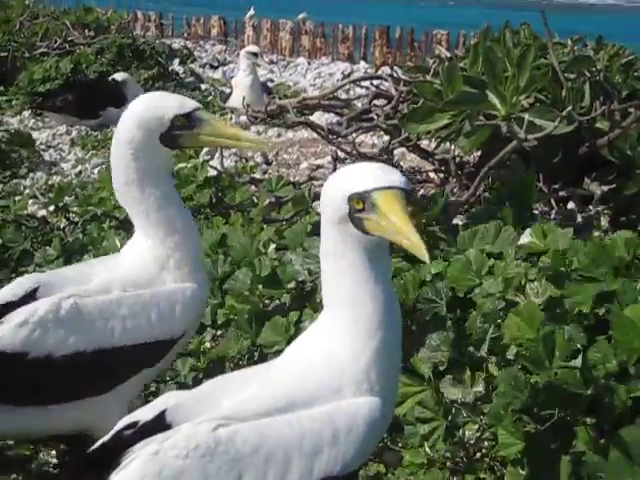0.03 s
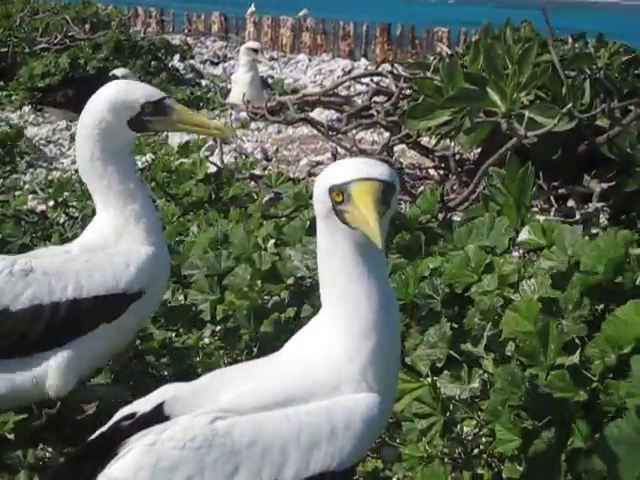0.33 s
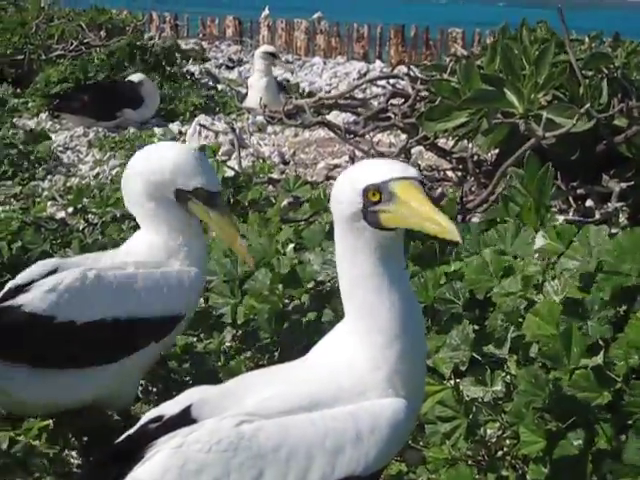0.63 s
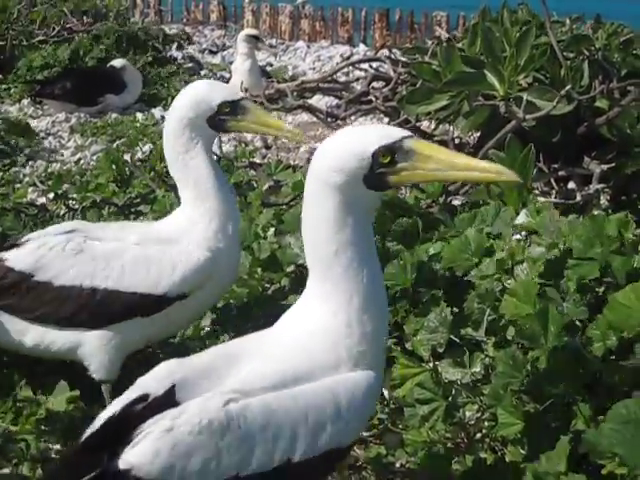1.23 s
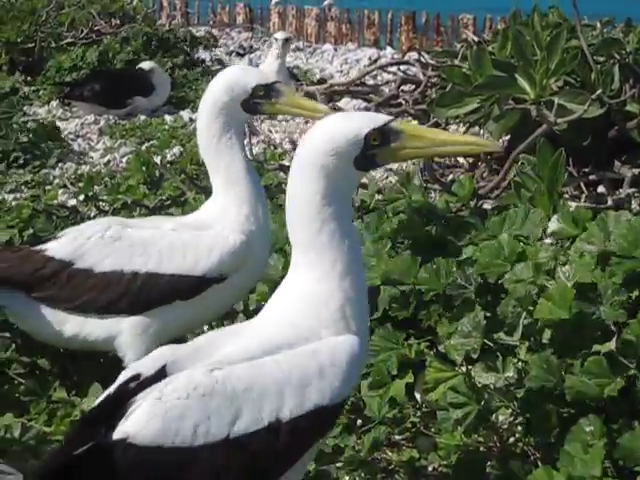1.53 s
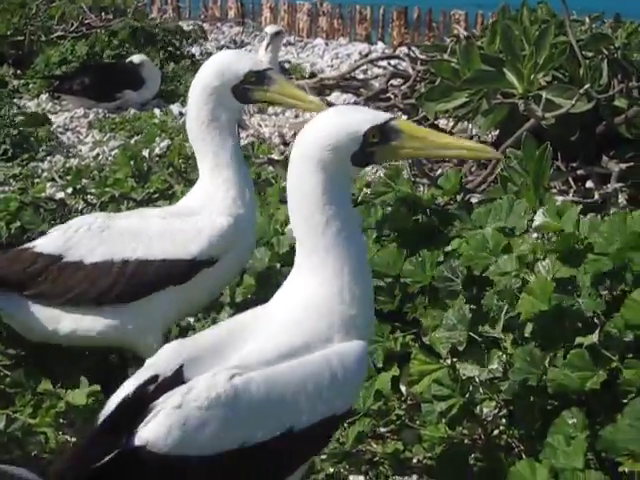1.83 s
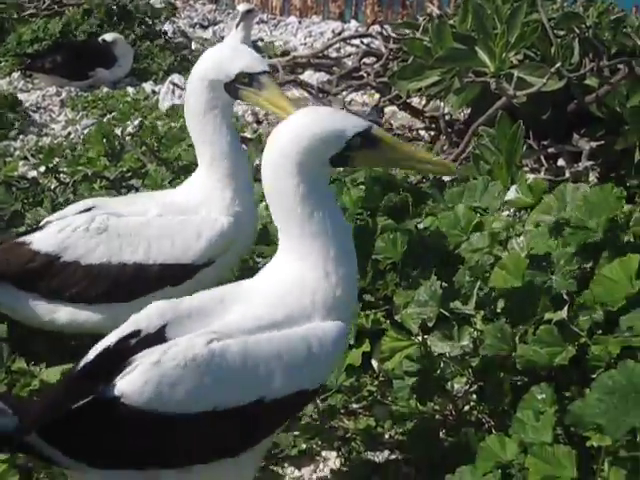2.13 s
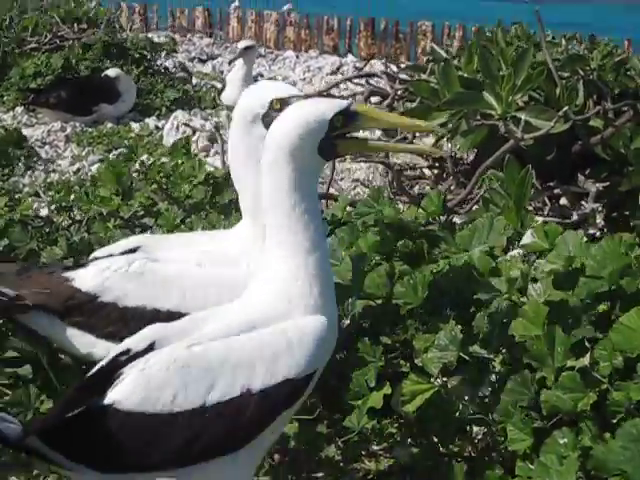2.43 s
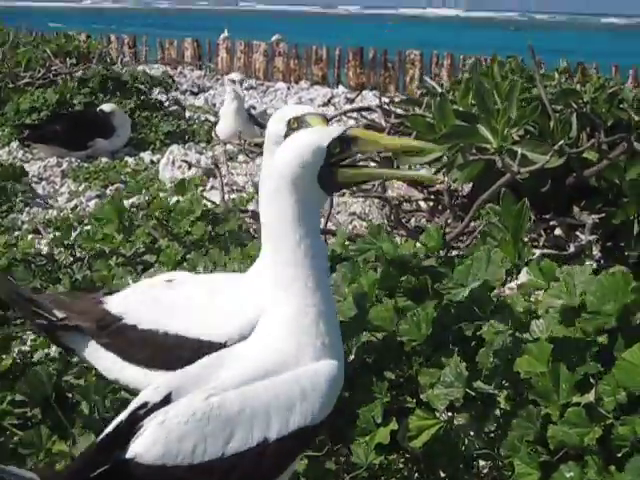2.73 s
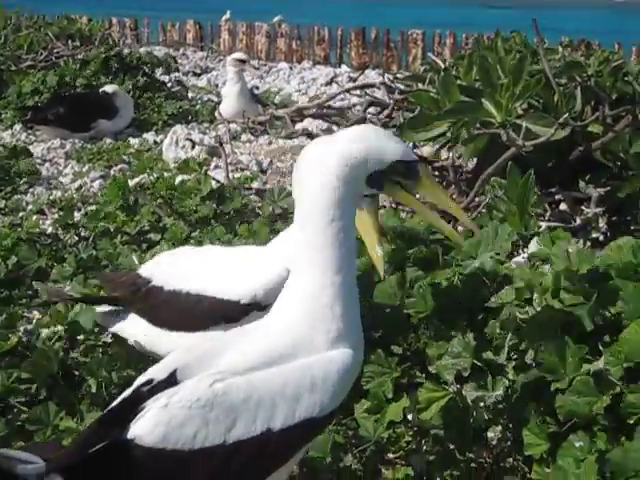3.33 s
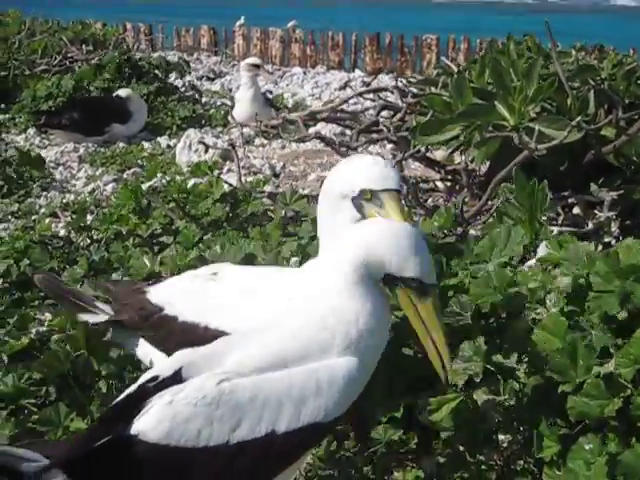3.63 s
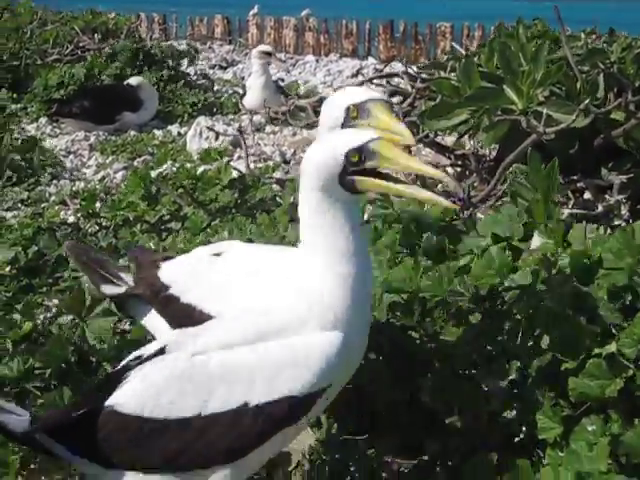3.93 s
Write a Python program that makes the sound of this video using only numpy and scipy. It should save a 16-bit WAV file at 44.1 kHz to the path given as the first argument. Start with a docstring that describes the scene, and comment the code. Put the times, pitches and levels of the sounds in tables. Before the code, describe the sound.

Two seabirds call close by on a windy shore. Gusts first rumble and thump on the microphone, then one bird gives four short harsh honks while the other answers with three airy whistles, over faint surf and leaves.

```python
"""Two boobies on a windy shore

Close to the microphone one bird honks: its syrinx locks into a clean note, or the two sides beat
harshly. The other answers with airy whistles that hop between the resonances of its windpipe.
Gusts rumble and thump on the microphone over a hiss of far surf and leaves."""
import sys
import numpy as np
from scipy import signal
from scipy.fft import rfft, irfft
from scipy.io import wavfile
from scipy.ndimage import map_coordinates

SR = 44100
rng = np.random.default_rng(int(sys.argv[2]) if len(sys.argv) > 2 else 0)


def wrap_up_sound(samples):
    """Save the sound to the file named by the first command line argument, as 16-bit audio."""
    columns = np.atleast_2d(samples).T
    # keep every value between -1 and 1, then stretch to whole-number steps
    tamed = np.clip(columns, -1, 1)
    steps = np.round(tamed * 32767).astype(np.int16)
    wavfile.write(sys.argv[1], SR, steps)


N = 176400
T = np.arange(N) / SR
TOP_HZ = 15750
GRID_HZ = np.geomspace(40, 16000, 400)  # resonant spectra are drawn on these frequencies


def amp(db):
    """Decibels to gain."""
    return 10 ** (np.asarray(db) / 20)


def unit(x):
    """Scale to rms 1."""
    return x / np.sqrt(np.mean(x ** 2) + 1e-20)


def along(spectrum, hz):
    """Level at hz of (freq_hz, level_db) points joined on a log axis."""
    freqs, levels = np.transpose(spectrum)
    return np.interp(np.log(np.abs(hz) + 1), np.log(freqs + 1), levels)


def curves(rows, t):
    """Each column after the time, at times t."""
    times, *columns = np.transpose(rows)
    return [np.interp(t, times, column) for column in columns]


def wobble(rate, t):
    """A smooth random curve, rate knots a second."""
    return map_coordinates(rng.standard_normal(4096), [(t - t[0]) * rate], mode="wrap")


def coloured(x, spectrum):
    """Filter x by a (freq_hz, level_db) spectrum."""
    return irfft(rfft(x) * amp(along(spectrum, np.fft.rfftfreq(len(x), 1 / SR))), len(x))


def noise(spectrum, size=N):
    """Coloured noise of rms 1."""
    return unit(coloured(rng.standard_normal(size), spectrum))


def phase(hz):
    """Running phase of a pitch curve."""
    return 2 * np.pi * np.cumsum(hz) / SR


def add(out, start_s, x):
    """Mix x in from start_s, cutting what falls outside."""
    start = round(start_s * SR)
    skip = max(-start, 0)
    part = out[start + skip:start + len(x)]
    part += x[skip:skip + len(part)]


# Level of the background hiss as the recorder's gain rises and dips, before a common lift:
# time_s, low_hiss_db, high_hiss_db
HISS_LEVELS = [(0,-69.5,-72.5),(.38,-63.5,-77.5),(.66,-63,-61.5),(.83,-63,-68.5),(1.1,-61.5,-63),(1.35,-62,-69.5),(1.7,-58.5,-67),(1.95,-63,-78),(2.13,-59,-69.5),(2.44,-60.5,-67),(2.6,-71.5,-79.5),(3.05,-72.5,-85.5),(3.4,-67,-88),(4,-66,-76)]
# Colours of the distant surf and of the leaves: freq_hz, level_db
SURF_SPECTRUM = [(100,4),(400,4),(1000,5),(2000,-0.5),(3500,-2.5),(6000,-16),(10000,-30.5),(16000,-46.5)]
LEAF_SPECTRUM = [(2000,-7),(4500,0),(7000,-1.5),(10000,-5.5),(15000,-13)]
# Brief rustles in the leaves: centre_s, level_db, width_s
RUSTLES = [(1.56,-45.5,0.0018),(1.705,-52.5,0.006),(1.715,-46.5,0.0015)]


def shore(lift_db=6):
    """A hiss of far surf and leaves, rising and dipping with the recorder's gain, and a few rustles."""
    low_hiss_db, high_hiss_db = curves(HISS_LEVELS, T)
    low_hiss = amp(low_hiss_db + lift_db) * noise(SURF_SPECTRUM)
    flicker = amp(high_hiss_db + lift_db + 2.9 * wobble(32, T))
    rustle = sum(amp(db) * np.exp(-((T - s) / width) ** 2 / 2) for s, db, width in RUSTLES)
    return low_hiss + (flicker + rustle) * noise(LEAF_SPECTRUM)


def chirp(centre_s=1.588, pitch_hz=5720, level_db=-50, width_s=0.003):
    """A tiny, faint high chirp."""
    envelope = np.exp(-((T - centre_s) / width_s) ** 2 / 2)
    return amp(level_db) * envelope * np.sin(2 * np.pi * pitch_hz * T)


# Gusts at the microphone: time_s, level_db
GUSTS = [(0,-33),(.45,-36),(.55,-31),(.72,-37),(1,-35),(1.28,-44),(1.45,-37),(1.54,-44),(1.95,-52),(2.07,-48),(2.12,-37),(2.2,-43),(2.44,-40),(2.6,-54),(2.7,-45),(3,-39),(3.28,-42),(3.5,-34),(3.72,-48),(3.98,-34)]
# Colour of their rumble: freq_hz, level_db
RUMBLE_SPECTRUM = [(15,-11),(40,2.5),(100,2),(200,-2.5),(350,-12),(600,-28.5),(2500,-85)]


def wind_rumble(swing_db=4):
    """Wind flowing over the microphone makes a lumpy rumble."""
    gust_db, = curves(GUSTS, T)
    return amp(gust_db + swing_db * wobble(35, T)) * noise(RUMBLE_SPECTRUM)


# Eddies hitting the microphone: start_s, thump_db (before its trim), splutter_db, decay_s
BUFFETS = [(0.004, -7.5, -17, 0.0097), (0.019, -12.5, -33.5, 0.018), (0.062, -11, -22.5, 0.01),
           (0.087, -14, -23.5, 0.019), (0.115, -15, -24.5, 0.019), (0.15, -6, -16, 0.0058),
           (0.194, -18, -31, 0.012), (0.234, -13, -22.5, 0.018), (0.271, -10, -28.5, 0.015),
           (0.321, -18.5, -42.5, 0.013), (0.394, -12, -27.5, 0.0059), (0.498, -13.5, -23, 0.013),
           (0.532, -9, -33, 0.015), (0.573, -11.5, -31, 0.0073), (0.65, -12, -30, 0.013),
           (0.759, -11.5, -26, 0.0084), (0.78, -12, -28.5, 0.011), (0.966, -16, -25.5, 0.01),
           (1.114, -12, -43, 0.006), (1.222, -22, -43.5, 0.011), (1.339, -10, -40.5, 0.018),
           (1.368, -13, -26.5, 0.011), (1.445, -17, -39.5, 0.013), (3.16, -23.5, -42.5, 0.0077),
           (3.389, -21, -40, 0.014), (3.457, -16.5, -32.5, 0.014), (3.472, -9.5, -20, 0.014),
           (3.5, -14, -32, 0.017)]
# Colours of an eddy's two parts: freq_hz, level_db
THUMP_SPECTRUM = [(20,-15),(60,0.5),(130,-1),(250,-2),(400,-10.5),(600,-20),(1000,-67.5)]
SPLUTTER_SPECTRUM = [(150,-11),(350,-3),(500,-0.5),(900,-11),(1400,-27.5),(2200,-38),(4000,-64.5)]


def wind_buffets(thump_trim_db=-7.5, rise_s=0.0025, spiky_db=6.5):
    """Each eddy strikes the microphone with a low thump and a slightly shorter splutter."""
    out = np.zeros(N)
    t = np.arange(-2000, 6000) / SR
    for start, thump_db, splutter_db, decay in BUFFETS:
        thump = (THUMP_SPECTRUM, thump_db + thump_trim_db, 1.22 * decay)
        splutter = (SPLUTTER_SPECTRUM, splutter_db, decay)
        for spectrum, level_db, life in (thump, splutter):
            envelope = np.clip(t / rise_s, 0, 1) * np.exp(-(t / life) ** 2 / 2)
            spikes = amp(spiky_db * wobble(395.6, t)) * rng.standard_normal(len(t))
            puff = coloured(envelope * spikes, spectrum)
            puff *= np.linalg.norm(envelope) / np.linalg.norm(puff)
            add(out, start + t[0], amp(level_db) * puff)
    return out


# Pops of wind right on the diaphragm: centre_s, peak_db, centre_hz
POPS = [(0.156,-10.5,810),(.244,-23,660),(0.279,-17,460),(.504,-15.5,480),(.597,-16.5,430),(.785,-24,400),(1.008,-25.5,360),(2.098,-32.5,178.5),(2.129,-26,159),(2.238,-24,172),(2.321,-28,185),(2.348,-27,215),(2.883,-33.5,260),(2.902,-28,270),(3.234,-29.5,159),(3.299,-31,149.8),(3.438,-26,222),(3.481,-16.5,599),(3.489,-17,650)]


def wind_pops():
    """Each pop is one push and pull on the diaphragm."""
    out = np.zeros(N)
    t = np.arange(-2000, 6000) / SR
    for centre, peak_db, hz in POPS:
        angle = 2 * np.pi * hz * t
        add(out, centre + t[0], -amp(peak_db) * angle * np.exp((1 - angle ** 2) / 2))
    return out


# Ground and plants around the birds give back little treble: freq_hz, level_db
SCATTER_SPECTRUM = [(3000,0.5),(9000,-12.5)]


def ground_scatter(birds, level_db=-35, reverb_s=0.14):
    """The ground and plants scatter a faint, short tail back to the microphone."""
    t = np.arange(SR // 4) / SR
    tail = noise(SCATTER_SPECTRUM, size=len(t)) * amp(-60 * t / reverb_s)
    return amp(level_db) * signal.fftconvolve(birds, tail / np.linalg.norm(tail))[:N]


# Narrow resonances of windpipe and mouth, alike in both birds: centre_hz, lift_db
RESONANCES = [(3780,1),(4650,0.5),(5720,6.5),(7650,7),(8450,8.5),(9600,5),(10450,5.5)]


def tract(spectrum, hz, resonances=RESONANCES, width_hz=160):
    """The airway's gain in dB: a broad spectrum with narrow resonances on top."""
    peaks_db = sum(db * np.exp(-((hz - centre) / width_hz) ** 2) for centre, db in resonances)
    return along(spectrum, hz) + peaks_db


# Breaths of the answering bird, close by: apex_s, width_s, level_db
BREATHS = [(2.254,0.021,-30),(2.746,0.027,-39),(3.846,0.025,-36)]
# Colour of its rushing air: freq_hz, level_db
AIR_SPECTRUM = [(700,-24),(1500,-13),(2200,-11.5),(3200,-4.5),(4500,-3),(6000,-9),(7700,-24),(12000,-25.5),(16000,-38)]


def breath(pipe_spacing_hz=606, pipe_echo=0.25):
    """Air rushes with each whistle; an echo in the windpipe gives it evenly spaced resonances."""
    air = noise(np.c_[GRID_HZ, tract(AIR_SPECTRUM, GRID_HZ)])
    air = unit(air + pipe_echo * np.interp(T - 1 / pipe_spacing_hz, T, air))
    return air * sum(amp(db) * np.exp(-np.abs((T - s) / width) ** 2.9 / 2) for s, width, db in BREATHS)


# Steps of its three whistles: start_s, end_s, pitch_hz, level_db
WHISTLE_STEPS = [(2.226,2.236,2497,-21),(2.24,2.271,3088,-14),(2.274,2.286,2393,-18.5),(2.284,2.297,1800,-32),
                 (2.704,2.711,2290,-36.5),(2.715,2.724,2906,-24.5),(2.728,2.767,3600,-13),(2.771,2.785,2790,-25),(2.788,2.799,2194,-31),(2.793,2.82,1510,-52.5),
                 (3.807,3.817,2150,-41),(3.819,3.833,2860,-23),(3.837,3.853,3334,-21.5),(3.855,3.873,2640,-21),(3.877,3.886,1973,-27.5),(3.89,3.898,1550,-41)]


def whistles(hop_s=0.0056, glide_hz_per_s=14000, apex_round_s=0.015, jitter=0.0061, shake_db=0.8):
    """A near-pure tone glides up to an apex and down, hopping between windpipe resonances."""
    out = np.zeros(N)
    for start, end, hz, level_db in WHISTLE_STEPS:
        t = start - hop_s + np.arange(4096) / SR
        apex = min((row[0] for row in BREATHS), key=lambda s: abs(s - start))
        sag_hz = glide_hz_per_s * np.hypot(t - apex, apex_round_s)
        mid_sag_hz = glide_hz_per_s * np.hypot((start + end) / 2 - apex, apex_round_s)
        angle = phase((hz + mid_sag_hz - sag_hz) * (1 + jitter * wobble(900, t)))
        overtones = np.sin(2 * angle + 0.65 * wobble(570, t))
        overtones += 0.13 * np.sin(3 * angle + wobble(900, t))
        tone = np.sqrt(2) * (np.sin(angle) + amp(tract(AIR_SPECTRUM, 2 * hz) - 13) * overtones)
        gate = (1 + np.tanh(2 * (t - start) / hop_s)) * (1 + np.tanh(2 * (end - t) / hop_s)) / 4
        add(out, t[0], amp(level_db + shake_db * wobble(310, t)) * gate * tone)
    return out


# Combination tones of the syrinx: multiple of the second side's pitch, relative_db
COMBINATIONS = [(-1,-2),(1,0),(2,2),(3,-18)]


def syrinx(t, first_hz, second_hz, rough, second_db, tract_db, slope_db, waver_db=3.5, spread_rad=1.1):
    """One side's harmonics, joined when rough by the other side and their combination tones.
    Returns the tones and a rasp pulsed by the two sides, each near rms 1."""
    jitter = 0.005 + 0.004 * rough
    first = phase(first_hz * (1 + jitter * wobble(900, t)))
    second = phase(second_hz * (1 + jitter * wobble(900, t)))
    octaves = np.log2(GRID_HZ / 3000)
    families = [(0, 0.73)] + [(round(n), rough ** 2 * amp(db + second_db)) for n, db in COMBINATIONS]
    tones, power = 0, 0
    for n, weight in families:
        for m in range(0 if n > 0 else 1, 17):
            hz = np.abs(m * first_hz + n * second_hz) + 1
            colour_db = np.interp(hz, GRID_HZ, tract_db) + slope_db * np.interp(hz, GRID_HZ, octaves)
            flicker_db = waver_db * np.minimum(hz / 5000 + rough / 2, 1) * wobble(104.6, t)
            gain = weight * amp(colour_db + flicker_db) * (hz < TOP_HZ)
            lag = np.pi * np.sqrt(hz / 100)  # the throat delays low tones most
            wander = spread_rad * rough * wobble(30, t)
            tones += gain * np.cos(m * first + n * second - lag + wander)
            power += gain ** 2 / 2
    hiss = noise(np.c_[GRID_HZ, tract_db + 5 * octaves], size=len(t))  # brighter than the tones
    rasp = unit(hiss * (1 + 0.5 * np.cos(first)) * (1 + 0.5 * np.cos(second - first)))
    return tones / np.sqrt(power), rasp


# Broad colour of the honking bird's throat: freq_hz, level_db
THROAT_SPECTRUM = [(40,-84.5),(350,-14.5),(550,-39),(760,-4.5),(1200,2),(1400,2),(1650,2),(2050,-9.5),(2400,-4.5),(3500,-0.5),(4300,-2.5),(5300,-8.5),(6400,-10),(7200,-18),(9500,-23.5),(11500,-32.5),(16000,-40.5)]
# Moments when its clean note catches: time_s
CRACKS = [2.514,2.544,2.991]


def honk(pitch, start, swell, hold, release, level_db, mid_hz, droop, second_db, tilt, beak_hz, beak_db):
    """The syrinx sounds through throat and beak: it swells, holds and fades, duller when softer."""
    t = start + np.arange(6400) / SR
    onset_db = -16.5 * np.clip(1 - (t - start) / swell, 0, 1) ** 4.5
    release_db = -26.5 * np.clip((t - hold) / release, 0, 2) ** 2
    effort_db = onset_db + release_db
    first_hz, rough = curves(pitch, t)
    rough = np.clip(rough, 0, 1)
    second_hz = mid_hz - droop * (t - (start + hold + release) / 2) ** 2
    tract_db = tract(THROAT_SPECTRUM, GRID_HZ, RESONANCES + [(beak_hz, beak_db)])
    slope_db = tilt + 0.1 * effort_db  # per octave
    tones, rasp = syrinx(t, first_hz, second_hz, rough, second_db, tract_db, slope_db)
    rasp_gain = amp(-19) + amp(-12.5 + effort_db / 2) * rough
    crack_db = -6.5 * sum(np.exp(-((t - s) / 0.0036) ** 2) for s in CRACKS)
    flutter_db = 1.4 * rough * wobble(350, t)
    opening = np.clip((t - start) / 0.005, 0, 1)
    closing = np.exp(-np.maximum(t - hold - release, 0) / 0.004)
    envelope = amp(level_db + effort_db + crack_db + flutter_db) * opening * closing
    return envelope * (tones + rasp_gain * rasp)


# First side of the syrinx, one list per honk: time_s, pitch_hz, roughness (0 clean, 1 harsh)
HONK_PITCHES = [
    [(1.848,850,.9),(1.868,930,.9),(1.88,945,.9),(1.892,855,.8),(1.903,818,.7),(1.925,740,.7)],
    [(2.468,850,1),(2.477,878,.8),(2.485,898,.08),(2.5,939,.04),(2.512,975,.08),(2.523,1027,.16),(2.537,1008,.16),(2.551,942,.04),(2.573,833,.05),(2.59,740,.1)],
    [(2.918,830,.9),(2.941,945,.75),(2.951,955,.12),(2.965,963,.06),(2.978,942,.03),(2.991,891,.06),(3.006,825,.2),(3.02,747,.3)],
    [(3.558,740,.8),(3.58,800,.9),(3.594,800,.9),(3.604,787,.62),(3.625,765,.68),(3.64,730,.85),(3.665,680,.7)],
]
# Honks close to the microphone: start_s, swell_s, hold_until_s, release_s, level_db, second_mid_hz,
# second_droop_hz_per_s2, second_db, tilt_db_per_octave, beak_hz, beak_lift_db
HONKS = [(1.846,0.01,1.879,0.05,-19,1154,31500,0.5,-2.5,3830,4.5),(2.467,0.0053,2.563,0.022,-18.5,1128,29900,-1.5,0.5,3050,6),(2.919,0.056,2.985,0.029,-18,1196,29960,0.5,0,3560,5.5),(3.557,0.041,3.614,.048,-18.5,1181,140000,13,0,2720,6.5)]


def honks():
    """The honking bird calls four times."""
    out = np.zeros(N)
    for pitch, (start, *settings) in zip(HONK_PITCHES, HONKS):
        add(out, start, honk(pitch, start, *settings))
    return out


def scene():
    """Two close birds in wind and far surf, at one microphone."""
    birds = honks() + breath() + whistles()
    scatter = ground_scatter(birds)
    wind = wind_rumble() + wind_buffets() + wind_pops()
    return (shore() + chirp() + wind + scatter + birds)[None]


def record(dry):
    """Nothing is kept above the band limit."""
    return irfft(rfft(dry) * (np.fft.rfftfreq(N, 1 / SR) < TOP_HZ), N)


dry = scene()
out = record(dry)
wrap_up_sound(out)
```